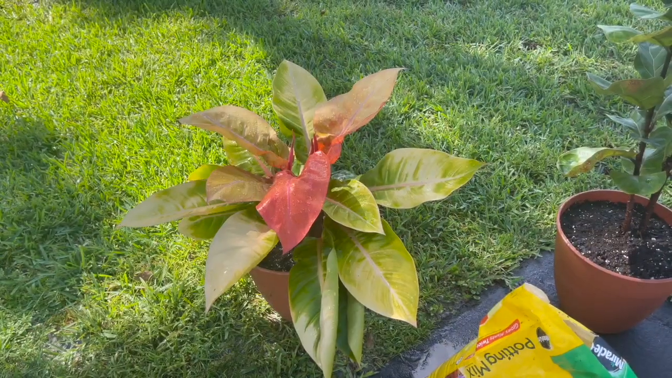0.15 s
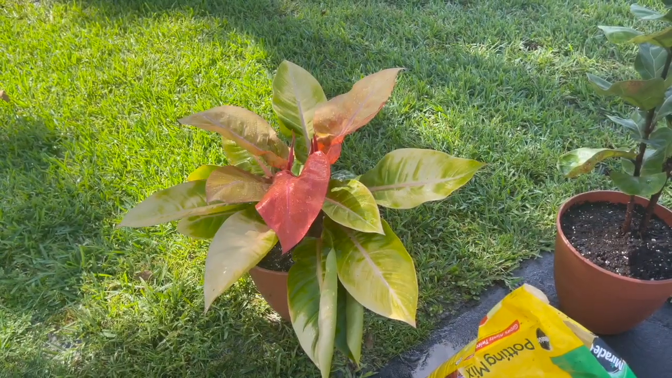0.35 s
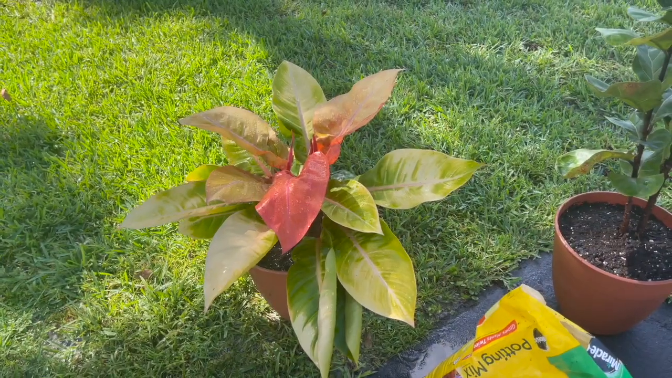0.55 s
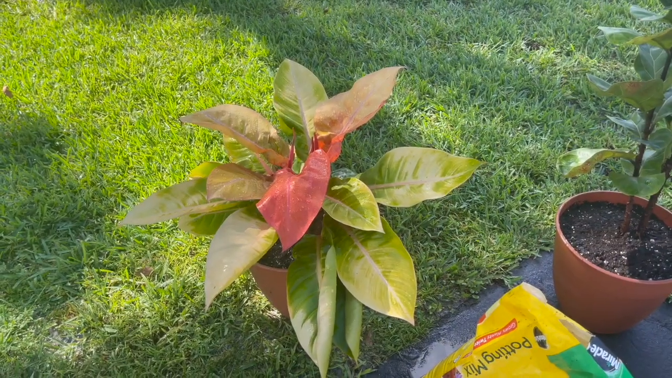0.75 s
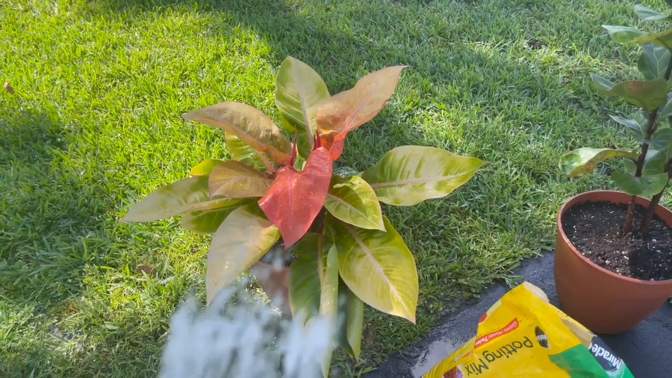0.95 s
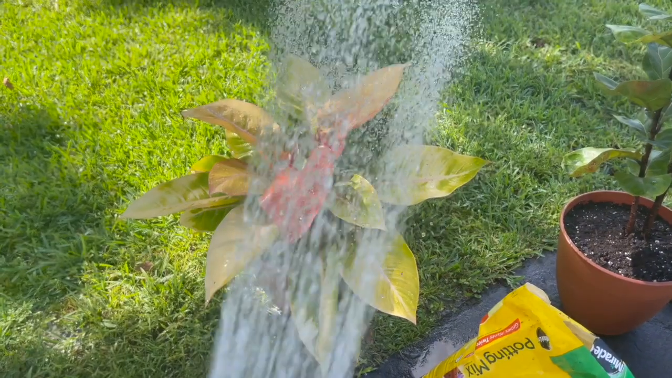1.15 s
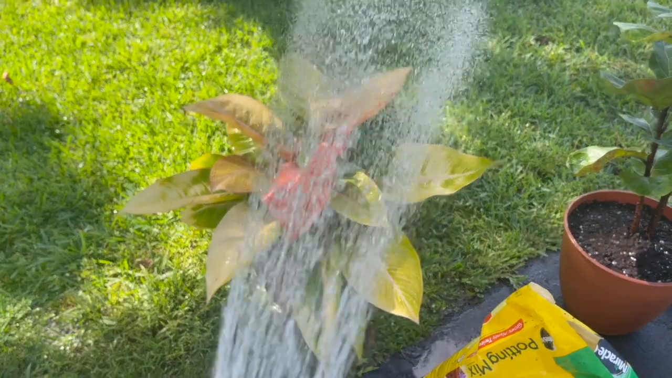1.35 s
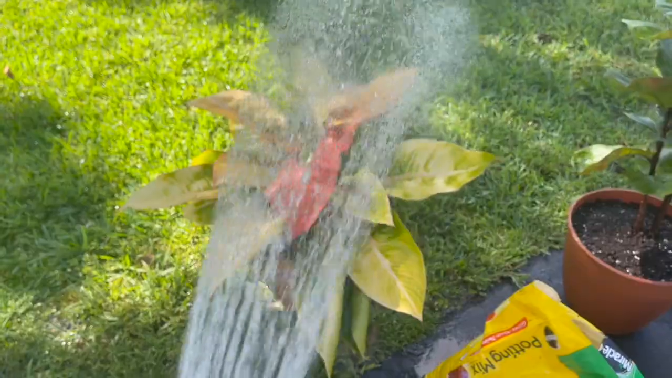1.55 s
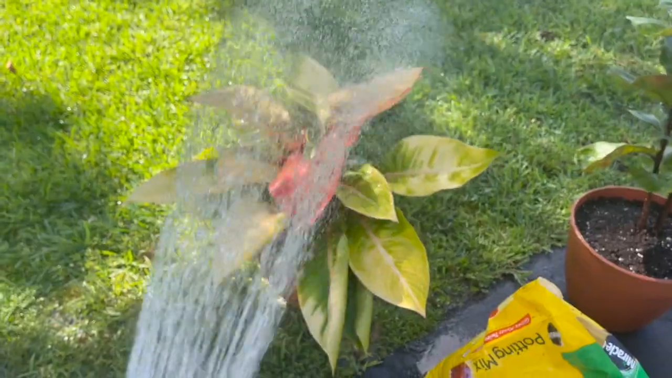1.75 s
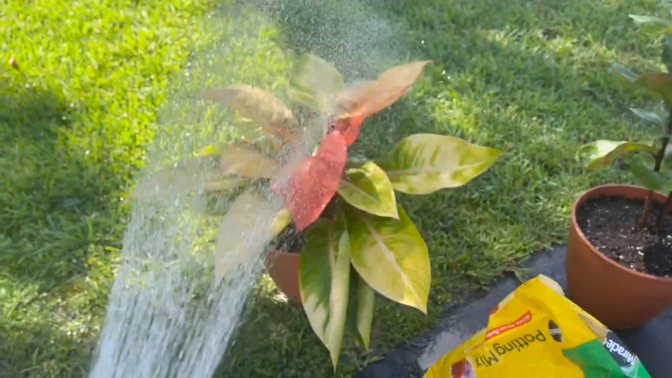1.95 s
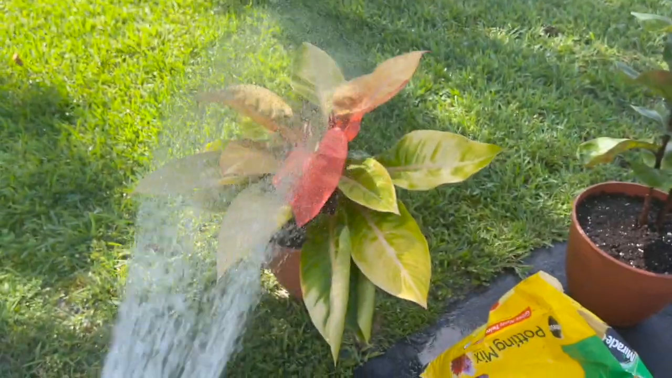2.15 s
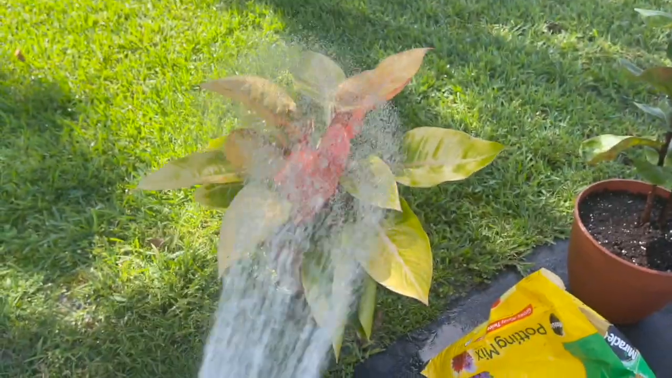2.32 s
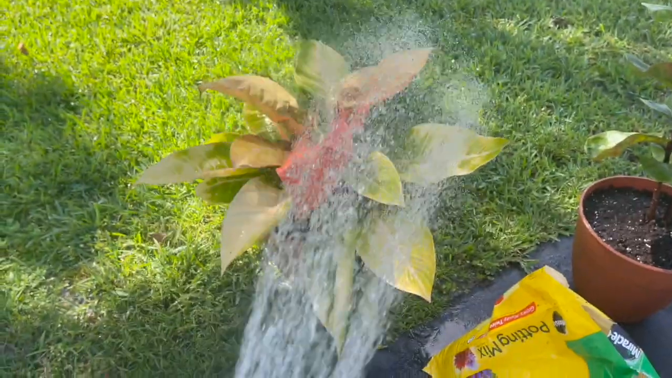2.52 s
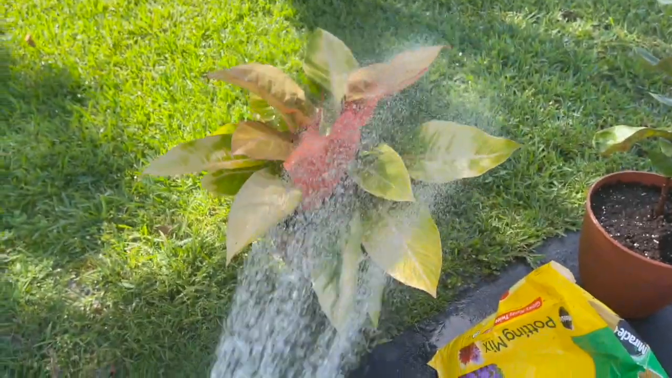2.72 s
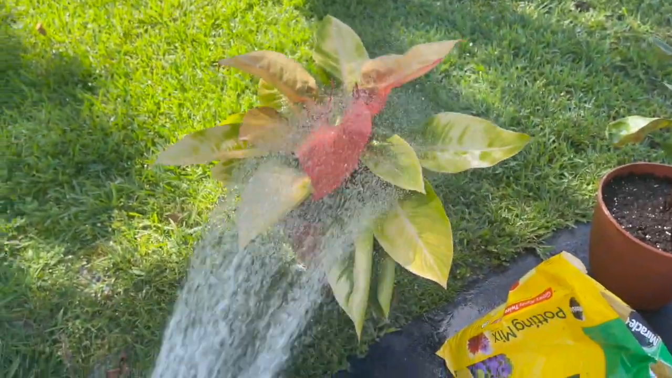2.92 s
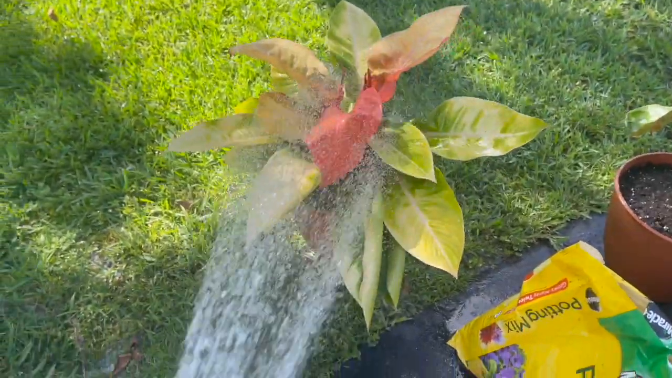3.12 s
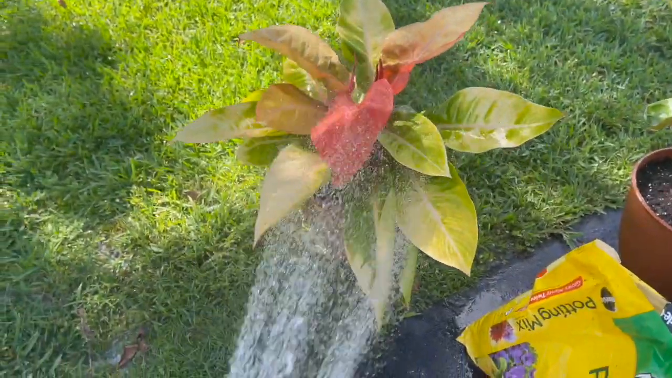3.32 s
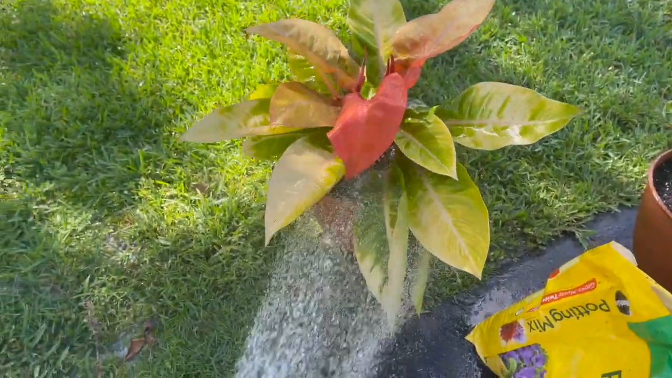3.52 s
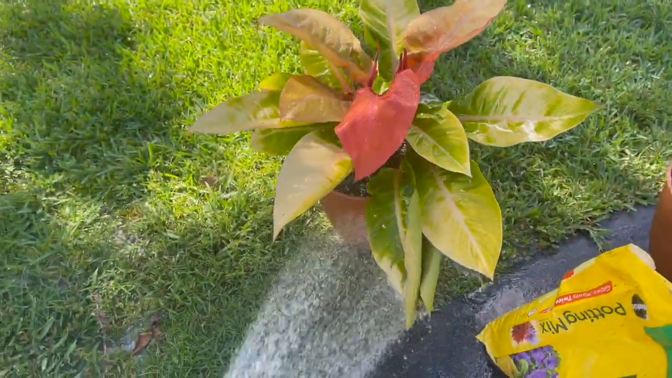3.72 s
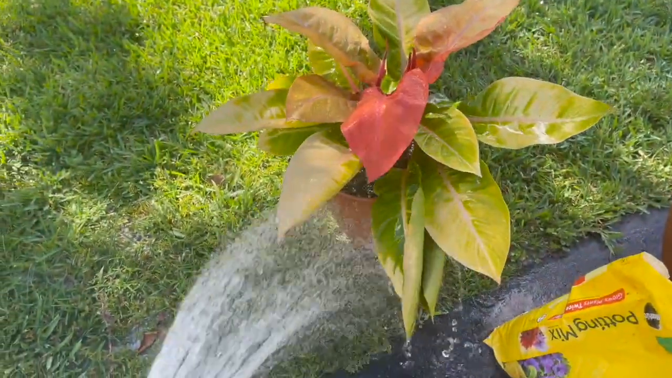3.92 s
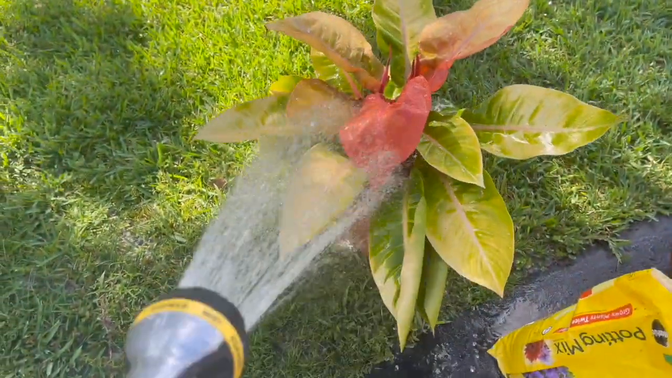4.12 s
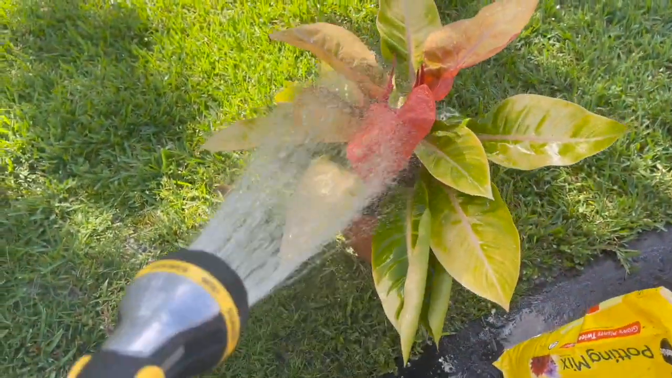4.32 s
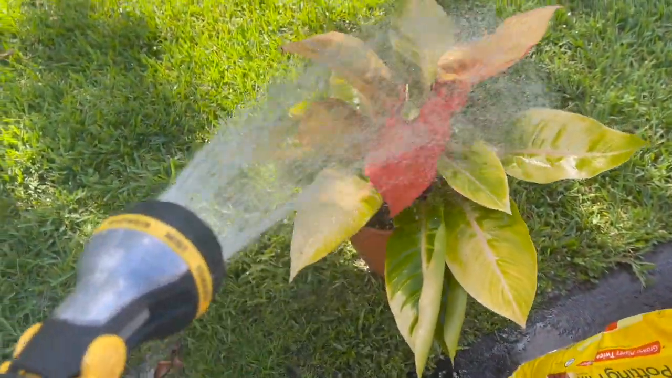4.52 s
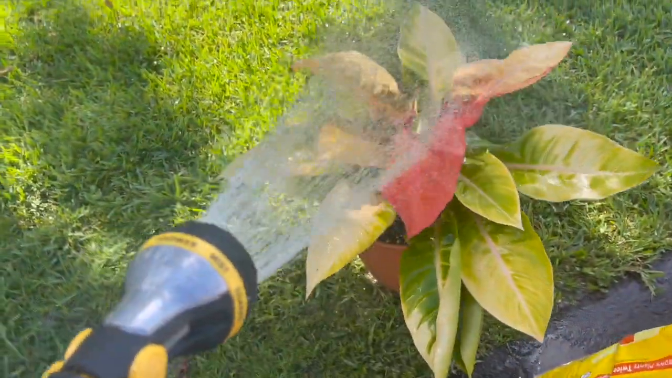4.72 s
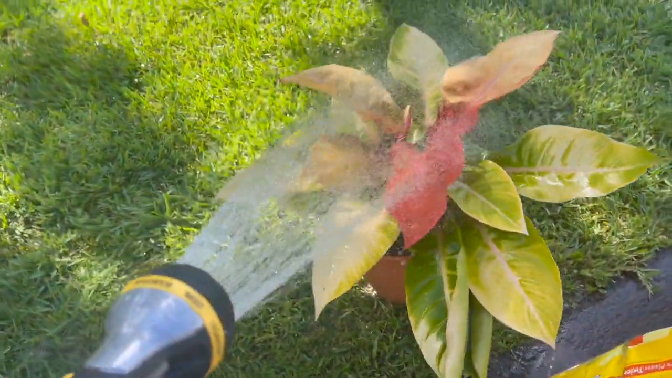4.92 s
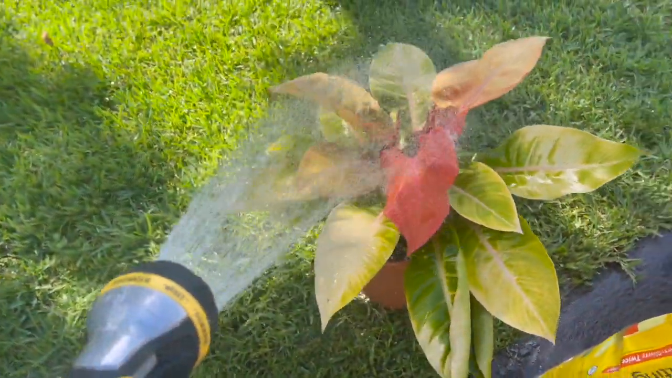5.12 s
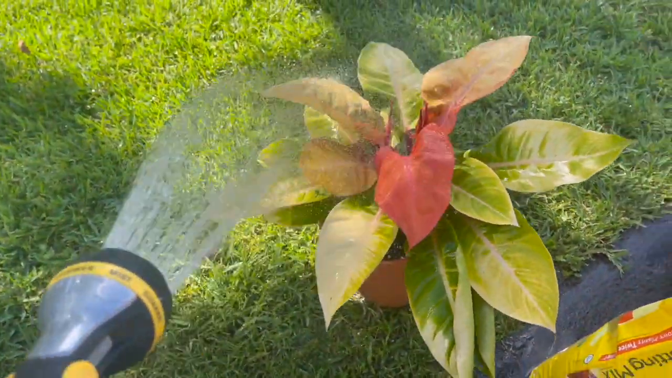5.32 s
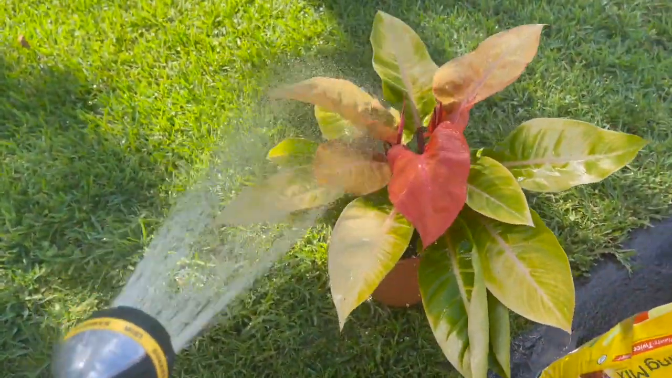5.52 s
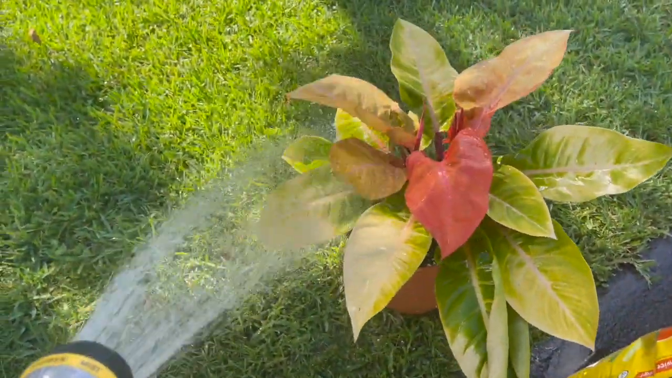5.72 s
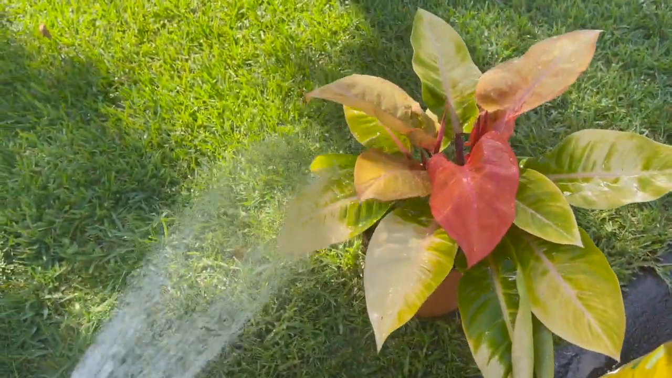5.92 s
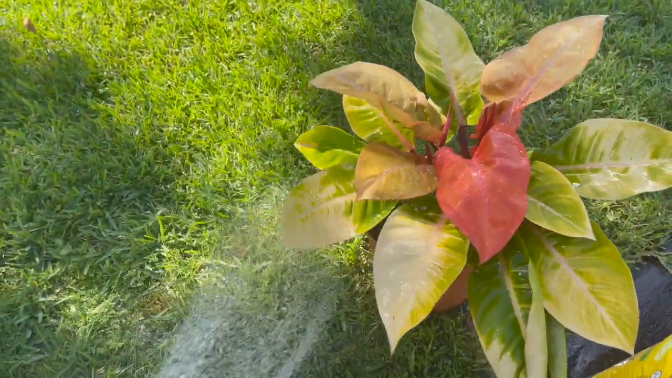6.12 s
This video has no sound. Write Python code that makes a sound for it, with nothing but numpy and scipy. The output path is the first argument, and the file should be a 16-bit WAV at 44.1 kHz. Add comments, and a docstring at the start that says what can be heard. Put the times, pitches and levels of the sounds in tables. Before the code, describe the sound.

Quiet garden with faint low traffic, then a hose nozzle bursts open, hissing and sputtering as water patters over a potted plant's leaves.

```python
"""Far traffic, hums and garden rustle lie below throughout. At 0.8 s a hand-held hose nozzle opens on a lawn:
water hisses turbulently through the rose and sounds the nozzle's chamber, with broad bands near
4.2 and 7.7 kHz strongest at 1.3-1.5 s, and bursts of trapped air make the jet sputter.
Clumps of random drops patter on a potted plant and its soil; from about 3.6 s the patter takes on
passing resonant colours. Two close microphone ports hear it all."""
import sys
import numpy as np
from scipy import signal
from scipy.fft import rfft, irfft, next_fast_len
from scipy.io import wavfile
from scipy.ndimage import uniform_filter1d

SR = 44100
rng = np.random.default_rng(int(sys.argv[2]) if len(sys.argv) > 2 else 0)


def generate_wav(signal):
    """Clip the signal to [-1, 1] and save it as 16-bit WAV at the path in sys.argv[1]."""
    frames = np.transpose(np.atleast_2d(signal))
    scaled = np.clip(frames, -1, 1) * 32767
    pcm = np.round(scaled).astype(np.int16)
    wavfile.write(sys.argv[1], SR, pcm)


N = 271656

# Unless noted, levels are relative: shared gains, colours and ports act on them later.
# Resonances list (centre [Hz], width of one filter pass [Hz], level within the group [dB]).
# Chamber of the nozzle, and its upper shoulder
CHAMBER = [(1032, 190, 0.5), (1144, 210, -2)]
SHOULDER = [(1264, 280, 0)]
# Barrel of the nozzle: low overtones, high overtones, rush
LOW_OVERTONES = [(3158, 680, 2), (3626, 520, -2)]
HIGH_OVERTONES = [(5573, 270, -0.5), (6014, 380, 2)]
RUSH = [(4870, 1520, 0)]
# Broad bands near 4.2 and 7.7 kHz, strongest at 1.3-1.5 s
EARLY_BANDS = [(4190, 1100, -1), (7670, 2400, -0.5)]
# Sizzle of the treble
SIZZLE = [(10410, 1230, 0)]
# Narrow treble peak near 11.3 kHz, as the microphone ports colour it
PORT_PEAK = [(11180, 420, 3), (11517, 400, -2)]
# Level of the chamber: (time [s], chamber [dB], shoulder against the chamber [dB])
CHAMBER_LEVEL = [(0.808, -41.5, -1.5), (0.98, -41, -3), (1.282, -35, -11), (1.294, -28.5, -11),
                 (1.6, -30, -8), (1.9, -33, -13), (2.4, -32, -4.5), (2.9, -32.5, -4.5), (3.2, -30.5, -5.5),
                 (3.5, -33, -0.5), (3.84, -37.5, -0.5), (3.9, -33, -5.5), (4.2, -30.5, -9.5),
                 (4.8, -32, -3.5), (5.1, -35, -0.5), (5.4, -34, -4), (5.5, -32.5, -5), (5.66, -38, 3.5),
                 (5.72, -38, -1), (6.16, -38, -3)]
# Treble against the hiss setting: (time [s], early bands [dB], sizzle [dB], port peak [dB])
TREBLE = [(0.806, -12, 2, -8), (0.95, -15, -2, -5), (1.2, -19, -4, -13), (1.3, -7.5, 2, -18),
          (1.5, -7, 1, -17), (1.9, -22, -1, -4), (2.3, -22, -7.5, -9), (2.9, -13, -0.5, -6),
          (3.3, -27, -2.5, -16), (4.0, -27.5, -12, -6), (4.6, -28, -6, -4), (5.1, -33, -1.5, -2.5),
          (5.45, -20, -3, -4.5), (6.16, -36, -7, -1.5)]
# Colour of the hiss at the left port: (frequency [Hz], level [dB])
JET_COLOUR = [(300, -31), (1500, -19.5), (2400, -17.5), (2750, -15), (3300, -22.5), (4200, -15.5),
              (5200, -20), (6500, -13.5), (7300, -12), (8200, -15), (9000, -13.5), (10600, -7), (11200, 1),
              (11600, -13), (11950, -22), (12400, -25), (12950, -30), (13350, -55), (15700, -70)]
# Paths to the right port: (frequency [Hz], right minus left [dB], likeness [0-1], right leads by [rad])
NOZZLE_PORTS = [(300, 1, .8, 0), (700, -3, .8, -.5), (1080, -8, .92, -1.1), (1500, -4, .75, -1.8),
                (1950, -1, .85, -2.3), (2450, 0, .95, -3.14), (2900, -2, .8, -4.2), (3300, -4, .75, -4.6),
                (4200, -7, .65, -6.2), (5200, -10, .5, -6.8), (5900, -11, .75, -7.2), (6500, -8, .5, -7.2),
                (7300, -6, .65, -8.6), (8200, -3, .75, -6.3), (8800, -1, .85, -6), (9300, .5, .8, -4.7),
                (9700, 0, .92, -3.8), (10150, 0, .99, -3.14), (11200, 0, .95, -1.25), (11900, 1, .85, 0),
                (12800, 2, .55, .6), (13300, 0, .7, 3)]
CHOKE_IN_CHAMBER = 0.4  # share of a choke's level change [dB] that the chamber follows


def nozzle():
    """Turbulent noise and forced resonance: the flow hisses in the rose and sounds chamber and barrel."""
    on, hiss_db, low_db, high_db, rush_db = jet()
    flow = on * from_db(hiss_db + 0.39 * drift(23.0) + 1.3 * drift(330))  # flutter as the jets break up
    puffs, knocks = spits()
    hiss = turbulence() * flow + puffs

    stir = turbulence()
    opened, chamber_db, shoulder_db = in_time(CHAMBER_LEVEL)
    shoulder = from_db(shoulder_db) * rms_one(resonate(stir, SHOULDER))
    chamber = rms_one(resonate(stir, CHAMBER)) - shoulder
    roar = chamber * opened * from_db(chamber_db + CHOKE_IN_CHAMBER * choking())

    _, early_db, sizzle_db, peak_db = in_time(TREBLE)
    groups = [(LOW_OVERTONES, low_db), (HIGH_OVERTONES, high_db), (RUSH, rush_db),
              (EARLY_BANDS, early_db), (SIZZLE, sizzle_db), (PORT_PEAK, peak_db)]
    bands = sum(rms_one(resonate(stir, modes, waver_db=1.5)) * from_db(level_db)
                for modes, level_db in groups)

    body = roar + knocks + flow * bands + surges()
    hiss_at_ports = from_db(8.0) * at_ports(hiss, NOZZLE_PORTS, JET_COLOUR)
    return without_common(hiss_at_ports + at_ports(body, NOZZLE_PORTS))


def turbulence():
    """Turbulence as broadband noise: a steady random part and a grainy part of random clicks."""
    return 1.15 * rng.standard_normal((2, N)) + 0.79 * grains(7000, spread_db=2.0)


# The jet runs evenly between sudden changes of flow: (start [s], hiss [dB], slide [dB/s],
# then against the hiss: low overtones [dB], high overtones [dB], rush [dB])
JET = [(0.806, -57, 40, 6, -12, 2), (0.836, -43.5, 197, -7.5, -16, -2), (0.916, -26, -85, -11.5, -25, -9),
       (1.08, -38, -29, -9.5, -31, -10), (1.206, -36.5, 2, -14, -28, -26),
       (1.293, -26, -14, -13.5, -36, -39), (1.503, -31, -2, -14, -23, -12.5),
       (2.018, -28.5, -1, -9.5, -16, -15), (2.21, -27, 8, -15, -13, -14.5), (2.6, -29.5, 4, -12, -10, -18),
       (2.94, -27, -5, -12, -12.5, -20), (3.26, -30, 4, -11, -5.5, -10), (3.845, -33, 17.5, -13, -8, -13),
       (3.99, -25, 3, -13.5, -9, -20), (4.142, -32, 2, -12, -9.5, -15), (4.365, -25.5, -5, -8, -11, -20),
       (4.5, -28, -70, -9.5, -13, -21), (4.59, -25.5, -17, -7, -8.5, -16), (4.8, -27, -8, -7.5, -5.5, -13),
       (5.1, -28, 4.5, -6.5, -10.5, -8), (5.3, -26, -8, -8, -11.5, -11), (5.468, -34.5, 5, -10, -9, -17),
       (5.795, -29.5, -52, -10.5, -12, -17), (5.96, -34, -14, -11, -9, -13)]
CHANGE_S, TURN_S = 0.0041, 0.083  # a change of flow, and of colour, takes this long
# from SETTLED_S on, the weaker the jet the more it wavers
FULL_FLOW_DB, WAVER_PER_DB, SETTLED_S = -29.5, 0.29, 1.29


def jet():
    """Piecewise steady flow: each stretch holds its colour while its level slides; a weak jet wavers."""
    t = np.arange(N) / SR
    rows = np.array(JET)
    current = np.maximum(np.searchsorted(rows[:, 0], t) - 1, 0)
    start, level_db, slide, *colour_db = rows[current].T
    held_db = uniform_filter1d(level_db + slide * (t - start), max(round(CHANGE_S * SR), 1))
    weakness_db = np.clip(FULL_FLOW_DB - held_db, 0, 8.0)
    waver_db = WAVER_PER_DB * weakness_db * (t > SETTLED_S) * drift(100)
    colour_db = uniform_filter1d(colour_db, round(TURN_S * SR), axis=1)
    return (t >= rows[0, 0]), held_db + choking() + waver_db, *colour_db


# Air pockets disturb the jet, then burst out of the nozzle:
# (time [s], level change before, negative for a choke [dB], puff [dB], peak of the chamber's knock [dB])
SPITS = [(0.814, 0, -60, -26), (0.837, 4, -44, -31), (1.29, 1, -24, -25), (1.31, 1.5, -45, -22),
         (1.344, 2, -45, -35), (1.375, -1.5, -45, -30), (1.57, -0.5, -32, -45), (1.61, -1, -33, -45),
         (1.712, -3, -31.5, -44), (1.798, -6, -28.5, -45), (1.814, 0, -33, -45), (1.833, -1, -28, -42),
         (1.886, -1, -30.5, -45), (1.927, -4, -29, -34), (2.017, -5, -23.5, -39), (2.073, -0.5, -24, -40),
         (2.1483, -7, -22, -30), (2.2044, -8, -34, -38), (2.655, -1, -40, -50), (2.768, -3, -34, -50),
         (2.94, -3.5, -31, -50), (3.93, 0.5, -42, -44), (3.9785, -3.5, -27, -44), (4.363, -3, -32, -37),
         (4.59, -1, -40, -39), (5.741, -7, -23, -43), (5.775, -3.5, -21, -33.5), (5.968, 1, -25.5, -50)]
CHOKE_S = 0.013  # half length of a choke
PUFF_S, PUFF_EDGE_S = 0.021, 0.0054  # length of a puff between half-height points, and of each edge


def spits():
    """Impulse excitation: each burst is a puff of noise, and a knock that rings the chamber."""
    t, puffs, knocks = np.arange(N) / SR, np.zeros(N), np.zeros(N)
    for s, _, puff_db, knock_db in SPITS:
        inside = np.minimum(t - s, s + PUFF_S - t)
        puffs += from_db(puff_db) * np.clip(inside / PUFF_EDGE_S + .5, 0, 1)
        knocks[round(s * SR)] = from_db(knock_db)
    unit_peak = np.abs(resonate(signal.unit_impulse(SR // 10), CHAMBER)).max()
    ringing = resonate(knocks + 1e-18, CHAMBER) / unit_peak
    return puffs * rng.standard_normal((2, N)), ringing


def choking():
    """Flow modulation: the level, in dB, changes just before each burst, mostly dipping."""
    t = np.arange(N) / SR
    return sum(db * np.exp(-((t - s) / CHOKE_S + 1) ** 2) for s, db, *_ in SPITS)


# Slugs of water thud through the hose: (centre [s], half length [s], level [dB])
SURGES = [(0.913, 0.025, -37), (1.237, 0.015, -49)]


def surges():
    """Band-limited noise in short swells: dull thuds."""
    band = signal.butter(2, [220, 1300], "band", fs=SR, output="sos")
    return swells(SURGES) * rms_one(signal.sosfilt(band, rng.standard_normal((2, N))))


# Bands where the part common to both channels is removed, before and after 1.29 s:
# (centre [Hz], half width [Hz])
OPPOSITE_BANDS = [(2280, 330), (2660, 81)]


def without_common(pair):
    """Antiphase: within a band the part common to both channels is removed, leaving opposites."""
    size = next_fast_len(N)
    hz, (left, right) = np.fft.rfftfreq(size, 1 / SR), rfft(pair, size)
    early, late = [irfft((left + right) * np.exp(-((hz - centre_hz) / half_hz) ** 4), size)[:N]
                   for centre_hz, half_hz in OPPOSITE_BANDS]
    lateness = np.clip((np.arange(N) / SR - SETTLED_S) / TURN_S + 1, 0, 1)
    return pair - .5 * (early * (1 - lateness) + late * lateness)


# Water landing on the plant: (time [s], patter [dB], fullness [-0.5 thin to 1 dull])
SPLASH = [(0.8, -80, 0.9), (0.85, -51.5, 0.7), (0.88, -70, 0.9), (0.92, -60, 1), (0.97, -64, 1),
          (1.21, -64, 0.74), (1.25, -44.5, 0.58), (1.36, -52.5, 0.44), (2.32, -44.5, 0.17),
          (2.7, -42.5, 0.11), (2.86, -39, 0.18), (3.08, -42, 0.18), (3.28, -38.5, 0.23),
          (3.63, -43.5, 0.13), (3.75, -49, 0.021), (4.02, -48.5, 0.5), (4.08, -41, 0.28), (4.45, -39, 0.24),
          (4.69, -45, 0.04), (4.9, -38.5, 0.26), (5.43, -46.5, 0.32), (5.55, -41, 0.32),
          (5.72, -43.5, 0.014), (5.89, -44.5, 0.22), (6.03, -50, 0.2), (6.16, -56, -0.41)]
# Brief resonant swells in the patter:
# (centre [s], half length [s], share before mixing [0-1], resonance [Hz], width of one filter pass [Hz])
PATTER_COLOURS = [(3.64, 0.24, 0.95, 2110, 2500), (5.632, 0.035, 0.5, 1380, 300),
                  (5.78, 0.08, 0.36, 2650, 500), (5.874, 0.079, 0.16, 1770, 400)]
# Colour of the splash at the left port: (frequency [Hz], level [dB])
SPLASH_COLOUR = [(120, -16.5), (300, -5), (470, -8.5), (800, 2.5), (1300, 4), (2000, 2.5), (2700, 1),
                 (4000, -3), (6000, -3), (9000, -14)]
# Paths to the right port: (frequency [Hz], right minus left [dB], likeness [0-1], right leads by [rad])
SPLASH_PORTS = [(150, 1, .85, 0), (800, 0, .75, -.5), (1300, 2, .6, -.8), (1900, 2, .85, 0),
                (2600, 1, .6, -1.2), (3200, 0, .4, -3), (6000, -4, .3, -3), (9000, 0, .5, -3)]
DROPS_PER_S = 2600  # typical rate; chance thickens and thins it into clumps


def splash():
    """Random impacts: clumped drops tap leaves and soil, full or thin, with passing resonant colours."""
    on, level_db, fullness = in_time(SPLASH)
    taps = grains(DROPS_PER_S * from_db(3 * drift(20)), spread_db=2.5)
    low_pass = signal.butter(2, 1200, fs=SR, output="sos")
    drummed = .5 * rms_one(signal.sosfilt(low_pass, taps))
    coloured = sum(share * swells([(s, half, 0)]) * rms_one(resonate(taps, [(hz, width, 0)]))
                   for s, half, share, hz, width in PATTER_COLOURS)
    # negative fullness takes lows away: a thin patter
    mix = taps + np.clip(fullness, -.5, 1) * drummed + .5 * coloured
    return from_db(12.5) * at_ports(on * from_db(level_db) * mix, SPLASH_PORTS, SPLASH_COLOUR)


# Traffic swells: (time [s], level of the coloured noise [dB])
GARDEN_LEVEL = [(0, -46.5), (0.8, -46), (3.6, -44), (5.5, -45), (6.16, -43)]
# Colour of the garden at the left port: (frequency [Hz], level [dB])
GARDEN_COLOUR = [(30, -53), (55, -4), (80, -1.5), (110, -4), (240, -13.5), (330, -14.5), (450, -25),
                 (850, -17), (1300, -25.5), (2200, -31), (4000, -36), (5200, -35), (7200, -32), (8000, -29),
                 (9000, -26.5), (11300, -23), (12900, -47), (13300, -56)]
# Paths to the right port: (frequency [Hz], right minus left [dB], likeness [0-1], right leads by [rad])
GARDEN_PORTS = [(30, 1, .92, 0), (250, 1.7, .84, 0), (450, 1, .4, 0), (850, 2, .6, -3),
                (1300, 1, .55, -3.6), (2200, 0, .4, -5.7), (3500, 0, .45, -6.6), (5200, 0, .65, -3.1),
                (7200, 2, .25, -.3), (8500, 1, .4, .5), (9600, 0, .7, 2), (10300, 0, .98, 3.14),
                (11900, 0, .9, 6.3)]
# Hums from afar: (centre [Hz], width of one filter pass [Hz], median level [dB], waver [dB])
HUMS = [(55, 9, -61, 3), (239.8, 17.3, -59, 3), (855, 45, -68, 4)]
# Uneven low rumble near 46 Hz, swells placed by hand: (centre [s], half length [s], level [dB])
RUMBLE_SWELLS = [(3.6, 2.5, -54), (1.08, 0.07, -59), (1.77, 0.11, -51), (2.8, 0.19, -60),
                 (3.14, 0.068, -59), (3.6, 0.13, -63), (4.3, 0.32, -59), (5.3, 0.43, -58),
                 (6.04, 0.055, -45)]


def garden():
    """Filtered noise: far traffic and faint rustle, narrow-band hums and an uneven low rumble."""
    rustle = rng.standard_normal((2, N)) * from_db(1.13 * drift(5.0) + 0.67 * drift(13.4))
    air = rms_one(at_ports(rustle, GARDEN_PORTS, GARDEN_COLOUR))
    hums = sum(from_db(level_db + waver_db * drift(8.7))
               * rms_one(resonate(rng.standard_normal(N), [(hz, width, 0)]))
               for hz, width, level_db, waver_db in HUMS)
    rumble = swells(RUMBLE_SWELLS) * rms_one(resonate(rng.standard_normal(N), [(46.3, 22, 0)]))
    return air * from_db(in_time(GARDEN_LEVEL)[1]) + hums + rumble


# centre and half width of the band in which the channels are nearly equal and opposite
OPPOSED_HZ, OPPOSED_HALF_HZ = 10100, 330


def at_ports(pair, ports, colour=((1, 0),)):
    """Partial coherence: the right port hears the left's sound shifted in phase, plus unrelated sound."""
    size = next_fast_len(N)
    hz = np.maximum(np.fft.rfftfreq(size, 1 / SR), 1)

    def read(rows):
        """Log-frequency interpolation of each column."""
        row_hz, *columns = np.array(rows).T
        return [np.interp(np.log(hz), np.log(row_hz), c) for c in columns]

    (left_db,) = read(colour)
    right_db, alike, lead = read(ports)
    shared, own = rfft(pair, size) * from_db(left_db)
    right = from_db(right_db) * (alike * np.exp(1j * lead) * shared + np.sqrt(1 - alike ** 2) * own)
    opposed = np.exp(-((hz - OPPOSED_HZ) / OPPOSED_HALF_HZ) ** 4) * .93
    right = right * (1 - opposed) - shared * opposed
    return irfft(np.array([shared, right]), size)[:, :N]


WAVERS_PER_S = 7.0  # how fast wavering resonances swell and fade


def resonate(x, modes, waver_db=0):
    """Parallel resonance: two-pole modes, each applied twice for steep flanks; each may waver on its own."""
    out = 0
    for k, (hz, width, level_db) in enumerate(modes):
        r = np.exp(-np.pi * width / SR)
        b = (1 - r * r) / 2 * np.array([1, 0, -1])
        a = [1, -2 * r * np.cos(2 * np.pi * hz / SR), r * r]
        ring = signal.lfilter(b, a, signal.lfilter(b, a, x))
        waver = waver_db * drift(WAVERS_PER_S) if waver_db else 0
        out = out + (-1) ** k * from_db(level_db + waver) * ring  # neighbours alternate in sign
    return out


def grains(per_s, spread_db):
    """Random impulse trains: two unrelated streams of clicks of uneven size, rms 1."""
    sizes = from_db(spread_db * np.minimum(rng.exponential(1, (2, N)), 5))
    signs = rng.choice([-1, 1], (2, N))
    clicks = sizes * signs * (rng.random((2, N)) < per_s / SR)
    return rms_one(clicks / np.sqrt(per_s))


def drift(rate):
    """Low-passed noise: slow chance below about the given rate [Hz], rms 1."""
    r = np.exp(-20 * np.pi * rate / SR)  # computed at a tenth of the sample rate
    noise = rng.standard_normal(N // 10 + 8002)
    slow = signal.lfilter([1], [1, -2 * r, r * r], noise)[8000:]  # drop the settling
    return np.interp(np.arange(N) / 10, np.arange(len(slow)), rms_one(slow))


def swells(rows):
    """Amplitude envelopes: bell-shaped rises and falls."""
    t = np.arange(N) / SR
    return sum(from_db(level_db) * np.exp(-((t - s) / half) ** 2) for s, half, level_db in rows)


def in_time(rows):
    """Linear interpolation: a gate that is shut before the first row, then each column as a curve."""
    s, *columns = np.transpose(rows)
    t = np.arange(N) / SR
    return (t >= s[0]), *[np.interp(t, s, c) for c in columns]


def from_db(db):
    """Decibel law: level to amplitude ratio."""
    return 10 ** (np.asarray(db) / 20)


def rms_one(x):
    """Energy normalisation: root mean square 1."""
    return x / np.sqrt(np.mean(x ** 2) + 1e-20)


def scene():
    """Superposition: the pressures of all sources add."""
    return nozzle() + splash() + garden()


RUMBLE_CUT_HZ, CUTOFF_HZ = 42, 15750
WEAK_HZ, WEAK_LOSS_DB = 13700, 14  # edge of the weakened top band, and its least loss


def record(dry):
    """Band limiting: deep bass is rolled off, the band above about 13.7 kHz weakened, and the top cut."""
    high_pass = signal.butter(2, RUMBLE_CUT_HZ, "high", fs=SR, output="sos")
    weakening = signal.cheby2(6, WEAK_LOSS_DB, WEAK_HZ, fs=SR, output="sos")
    top_cut = signal.ellip(12, .5, 90, CUTOFF_HZ, fs=SR, output="sos")
    thinned = signal.sosfilt(high_pass, dry)
    weakened = signal.sosfilt(weakening, thinned)
    return signal.sosfilt(top_cut, weakened)


dry = scene()
out = record(dry)
generate_wav(out)
```